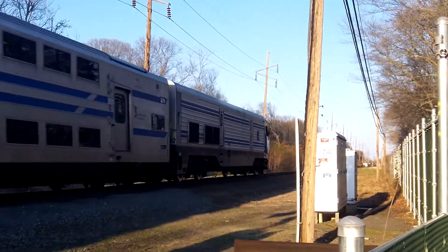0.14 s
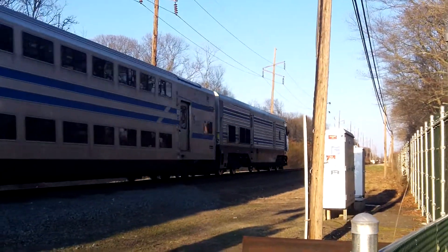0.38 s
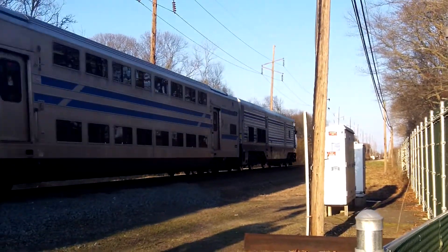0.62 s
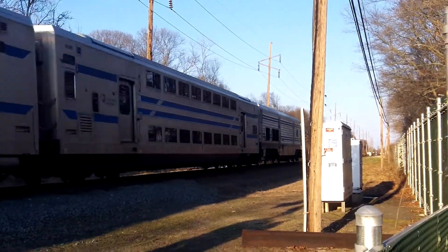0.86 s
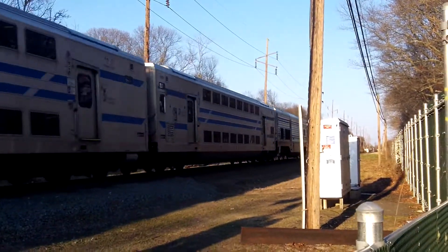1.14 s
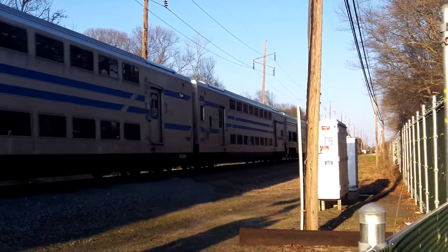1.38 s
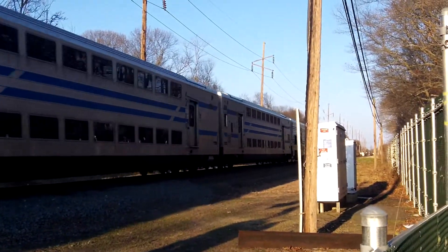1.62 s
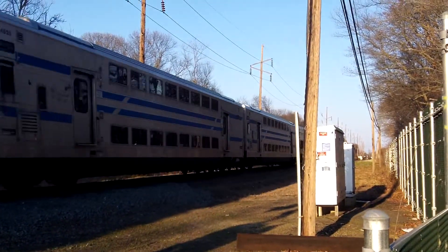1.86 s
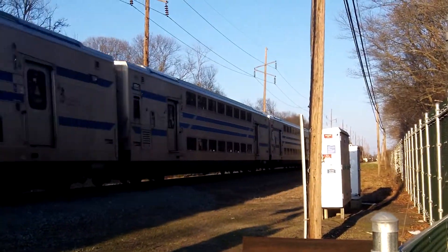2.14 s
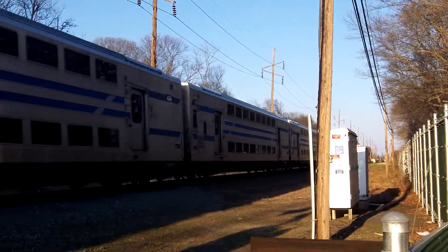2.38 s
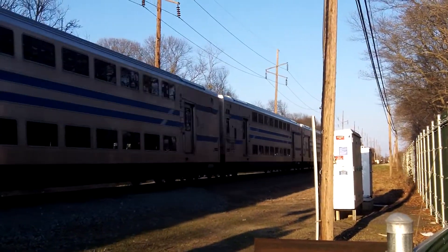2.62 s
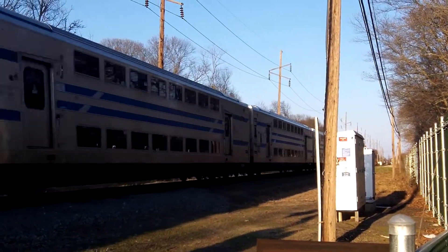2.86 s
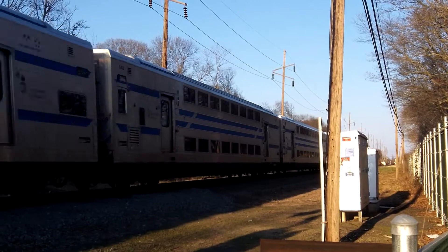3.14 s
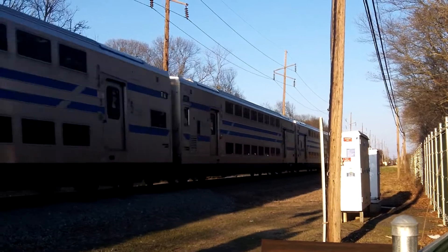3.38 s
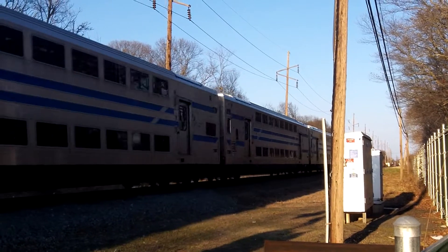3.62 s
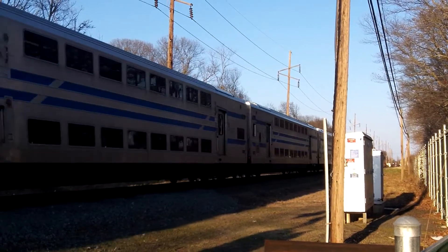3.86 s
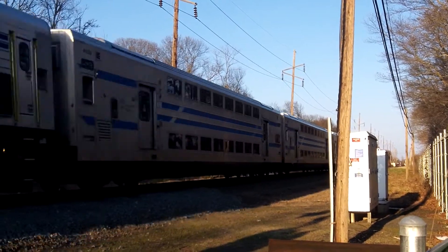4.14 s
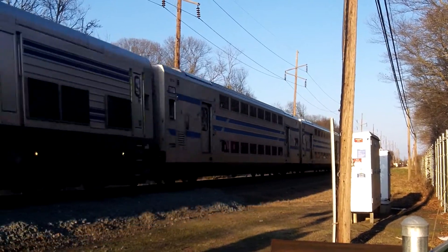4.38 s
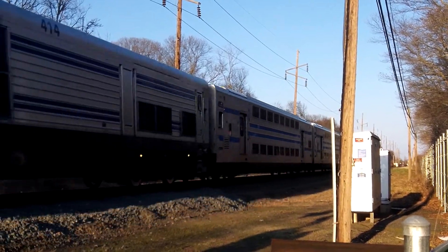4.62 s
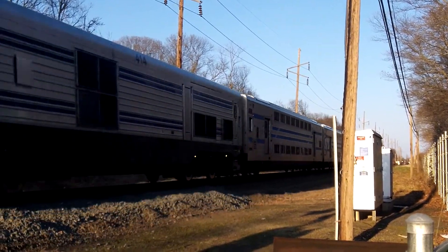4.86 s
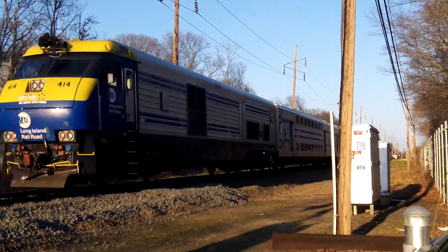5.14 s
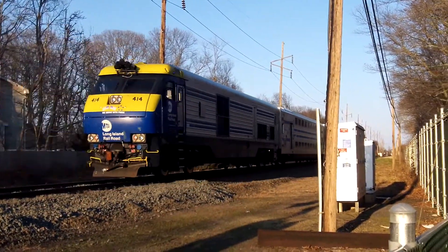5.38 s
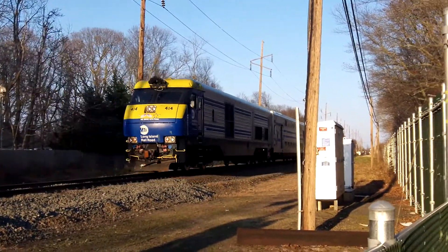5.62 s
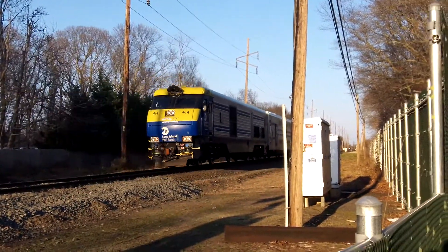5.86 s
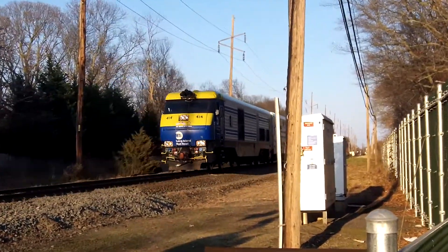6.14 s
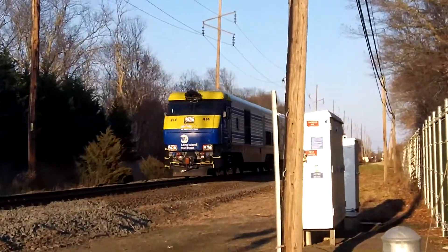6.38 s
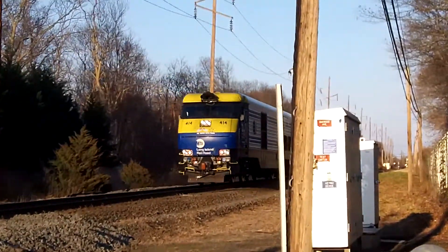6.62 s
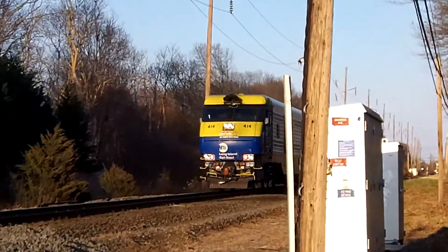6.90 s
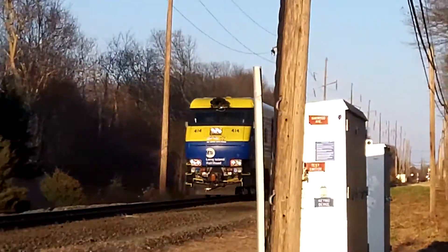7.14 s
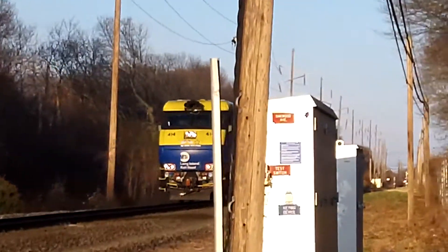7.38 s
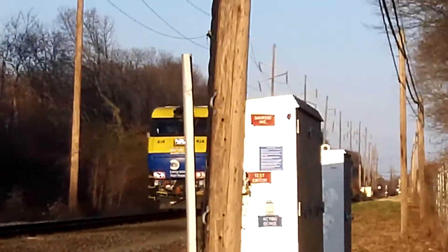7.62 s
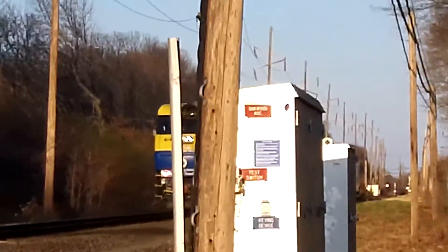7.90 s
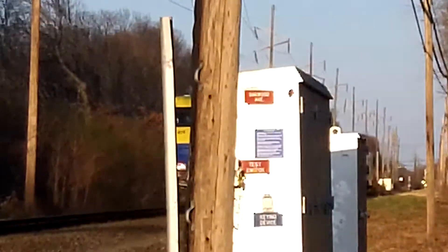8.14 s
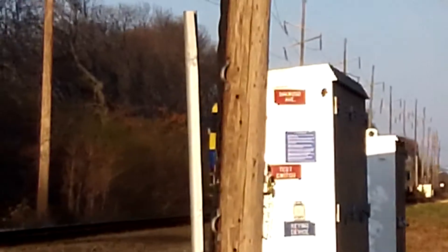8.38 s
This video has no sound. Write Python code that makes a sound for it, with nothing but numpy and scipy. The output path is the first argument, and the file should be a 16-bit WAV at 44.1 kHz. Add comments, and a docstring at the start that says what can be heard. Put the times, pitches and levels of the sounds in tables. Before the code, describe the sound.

Outdoors beside a railway, a passenger train rushes past close to the microphone. The leading diesel's hum fades while coach wheels roar, hiss, squeak and thump irregularly over rail joints. After about four seconds the rear diesel passes, its strong low drone dropping in pitch, and the clatter gives way to a steadier hum with a thin metallic whine.

```python
"""Passing train with two diesel locomotives

A passenger train with a diesel locomotive at each end rolls past the trackside. The exhaust hums are
harmonics of the engine cycle, Doppler-shifted: the front one recedes, the rear one nears, passes and
drops in pitch, and the two beat. Wheels roar and hiss as shaped noise, thump over rail joints as damped
oscillations and ring as resonances. A fast gain control pumps the quiet layers against the hum."""
import sys
import numpy as np
from scipy import signal
from scipy.fft import rfft, irfft, next_fast_len
from scipy.io import wavfile
from scipy.ndimage import uniform_filter1d, map_coordinates

SR = 44100
rng = np.random.default_rng(int(sys.argv[2]) if len(sys.argv) > 2 else 0)


def bounce(signal):
    """Save signal as a 16-bit WAV file at the path given by the first command-line argument."""
    frames = np.transpose(np.atleast_2d(signal))
    limited = np.clip(frames, -1, 1)
    pcm = np.round(limited * 32767).astype(np.int16)
    wavfile.write(sys.argv[1], SR, pcm)


def boost_factor(decibels):
    """Convert a level in decibels to a linear amplitude factor."""
    exponent = np.asarray(decibels, float) / 20
    return 10 ** exponent


N = 375291


def unit(x):
    """Normalization: scales a signal to rms 1."""
    return x / np.sqrt(np.mean(x ** 2) + 1e-20)


def curves(rows):
    """Linear interpolation: one value per sample for each column after the time."""
    s, *columns = np.transpose(rows)
    return [np.interp(np.arange(N) / SR, s, column) for column in columns]


def wobble(rate):
    """Random modulation: a smooth curve through Gaussian knots, rate knots a second."""
    knots = rng.standard_normal(int(N * rate / SR) + 4)
    return map_coordinates(knots, [np.arange(N) * rate / SR])


def filtered(x, response):
    """Linear filtering: multiplies the spectrum of x by a response of frequency."""
    m = next_fast_len(N + 8192)
    return irfft(rfft(x, m) * response(np.fft.rfftfreq(m, 1 / SR)), m)[:N]


def rush(spectrum, patchy_db):
    """Spectral shaping: coloured noise of rms 1 with random gain patches in time and frequency."""
    z = signal.stft(rng.standard_normal(N), nperseg=512)[2]
    field = uniform_filter1d(rng.standard_normal(z.shape), size=5, axis=0)
    field = uniform_filter1d(field, size=8, axis=1)
    noise = signal.istft(z * boost_factor(patchy_db * unit(field)), nperseg=512)[1][:N]
    hz, db = np.transpose(spectrum)
    return unit(filtered(noise, lambda f: boost_factor(np.interp(np.log(f + 1), np.log(hz), db))))


def band(hz, width, drift=0):
    """Resonance: rms-1 noise on a quadrature carrier whose pitch may wander by a share drift."""
    swing = [filtered(rng.standard_normal(N), lambda f: 1 / (1 + (f / width * 2) ** 2)) for _ in range(2)]
    turn = 2 * np.pi * np.cumsum(hz * (1 + drift * wobble(7))) / SR
    return unit(swing[0] * np.cos(turn) + swing[1] * np.sin(turn))


def knocks(rows, cycles):
    """Damped oscillation: soft-edged knocks whose envelope peaks after a number of cycles."""
    out = np.zeros(N + SR)
    for s, db, hz in rows:
        u = np.arange(int(6 * cycles * SR / hz)) * hz / SR  # time in cycles
        envelope = np.exp(1 - u / cycles) * u / cycles
        out[round(s * SR):][:len(u)] += boost_factor(db) * np.sin(2 * np.pi * u) * envelope
    return out[:N]


FIRING_HZ, SPEED_M_S, TRACK_M = 73.527, 23.94, 12.22  # firing rate at rest, train speed, distance to track
REV_UP_S = 7.07


def heard(passes_s, rev_up_hz=0):
    """Doppler effect: firing pitch is raised while the engine nears, lowered once it has passed."""
    t = np.arange(N) / SR
    along = SPEED_M_S * (t - passes_s)
    firing = FIRING_HZ + rev_up_hz * (t > REV_UP_S)
    recession = SPEED_M_S * along / np.hypot(along, TRACK_M)
    return firing / (1 + recession / 343)  # speed of sound in m/s


def exhaust(hz, rows, uneven):
    """Harmonic synthesis: the firing tone plus weaker multiples of the engine cycle, each swelling."""
    db, = curves(rows)
    t = np.arange(N) / SR
    sounding = (t >= rows[0][0]) & (t < rows[-1][0] + .05)
    turn = 2 * np.pi * np.cumsum(hz * sounding) / SR
    tone = np.cos(turn)
    for multiple, level_db in uneven:
        partial = np.cos(turn * multiple / 9 + 2 * np.pi * rng.random())  # nine firings a cycle
        tone += boost_factor(level_db + 2.5 * wobble(2)) * partial
    fade = uniform_filter1d(sounding * 1., size=4001, mode="nearest")
    return np.sqrt(2) * boost_factor(db) * fade * tone


# front exhaust hum, firing tone: t/s, level/dB
FRONT_HUM = [(0.0, -19.5), (0.5, -24.5), (0.9, -21.7), (1.55, -23.3), (1.95, -27), (2.3, -23.5),
             (2.85, -30), (3.15, -28), (3.6, -33)]
# rear exhaust hum, firing tone: t/s, level/dB
REAR_HUM = [(0.0, -29), (0.3, -24), (0.75, -36), (1.0, -28), (1.25, -23), (1.6, -26), (2.0, -23),
            (2.8, -22.7), (3.15, -18.5), (3.7, -17.2), (4.3, -18), (5.0, -17), (5.55, -19), (6.1, -16.9),
            (7.0, -16.7), (7.3, -17.4), (7.95, -16.5), (8.11, -18.5), (8.165, -23.5), (8.23, -20),
            (8.3, -28), (8.38, -21), (8.5, -20.7)]
# rear hum thrown back by what lies ahead of the train: t/s, level/dB
ECHO = [(4.792, -40), (5.45, -28), (6.25, -38), (6.7, -31), (7.0, -35), (7.35, -31), (7.8, -42), (8.5, -32)]
# partials from uneven firings: multiple of the engine cycle, mean level re firing tone/dB
UNEVEN_FIRING = [(6, -19), (7, -15), (8, -22), (10, -28), (11, -27), (12, -27), (15, -26), (18, -31),
                 (21, -32), (24, -35), (27, -36)]


def engine_hums():
    """Interference: two Doppler-shifted hums and an echo raised in pitch beat; the rear engine revs up."""
    front = exhaust(heard(passes_s=-0.954), FRONT_HUM, UNEVEN_FIRING)
    rear = exhaust(heard(passes_s=4.249, rev_up_hz=0.69), REAR_HUM, UNEVEN_FIRING)
    return front + rear + exhaust(78.17, ECHO, [])


# part of the noise from the rear locomotive rather than the coaches: t/s, share (0-1)
LOCOMOTIVE_SHARE = [(0, 0.11), (3, 0.11), (3.6, 0.07), (4.6, 0.87), (5.3, 0.95), (8.51, 1)]


def blend(coaches, loco):
    """Power-preserving crossfade: coach sound gives way to the rear locomotive."""
    share = curves(LOCOMOTIVE_SHARE)[0]
    return np.sqrt(1 - share) * coaches + np.sqrt(share) * loco


def unsteady():
    """Modulation depth: share of flicker left, as the locomotive sounds steadier than the coaches."""
    return 1 - 0.55 * curves(LOCOMOTIVE_SHARE)[0]


# short rises and dips of roar, growl and hiss: t/s, roar gain/dB, growl gain/dB, hiss gain/dB
RISES_AND_DIPS = [(0.29, 0, 11, 4.5), (0.4, -4, 3, 1), (0.48, 9.5, 8, -0.5), (0.58, 4, 5, 3.5),
                  (0.78, 4, -2, 3.5), (0.93, -12, 0, 0.5), (0.99, -2, -4, -2), (1.04, 0.5, 7, 3),
                  (1.18, 5, 1, 2), (1.35, -4, 6, 2.5), (1.6, 6, 6, 1.5), (1.68, 4, -15, 3.5),
                  (1.77, 4, -1, 0.5), (1.86, -2, -4, 3), (2.03, 10, 5.5, 5), (2.15, 3, -3, 4.5),
                  (2.21, 5, 5, 3.5), (2.35, 5, -9, 3.5), (2.49, 6, 3, 4), (2.57, 0, 5, 4.5),
                  (2.68, 5, 5, 4), (2.79, 1, 6, 1.5), (2.87, 12.5, 12, 3), (3.04, 9, 7.5, 2),
                  (3.14, 0, 3, 0.5), (3.25, -1, 9, 1.5), (3.6, 3, 2, 0.5), (3.82, 8, 0, 2),
                  (3.92, 3, 14, 0.5), (4.17, 1, 7, 0.5), (4.28, 6, 8, 4), (4.35, 3.5, 2, 2.5),
                  (4.45, -1, 6.5, 3.5), (4.76, 3, 9.5, -0.5), (4.88, -5, 8, -1), (5.21, 7, 3, 1.5),
                  (5.31, -3, -1, 2), (5.44, -5, 2, 3.5), (5.625, 7, 10, 5), (5.7, 5, 0, 1.5),
                  (5.745, 6, 7, 6), (5.87, 0, 5, 3), (6.1, 5, 4, 5.5), (6.27, 6, 6, 5.5), (6.39, -2, -3, 3),
                  (6.52, 3, 7.5, 3.5), (6.63, 9, 4, 5), (6.75, 7, -4, 3.5), (7.11, 3, 7, 5),
                  (7.35, 0.5, 5, 4.5), (7.49, -2, 4, 2), (7.59, 0, 5, 5.5), (7.8, 1, 4, 1),
                  (8.09, 1, 4, 2.5), (8.22, 6, 5.5, 3)]
# Gaussian half width of a rise or dip: one entry each for roar, growl and hiss [s]
RISE_WIDTHS = [0.013, 0.013, 0.024]


def rises_and_dips():
    """Amplitude modulation: gain in dB of roar, growl and hiss, a sum of short Gaussian rises and dips."""
    t = np.arange(0, N, 64) / SR  # a coarse grid suffices
    s, *gains = np.transpose(RISES_AND_DIPS)
    sums = [db @ np.exp(-.5 * ((t - s[:, None]) / width) ** 2) for db, width in zip(gains, RISE_WIDTHS)]
    return [np.interp(np.arange(N) / SR, t, row) for row in sums]


def thuds(roar_db):
    """Random impacts: wheel flats and loose parts under the coaches thud at a level tied to the roar."""
    when, size, pitch = rng.random((190, 3)).T
    s = when * (N - 1) / SR
    db = roar_db[(s * SR).astype(int)] - 1 + 10 * (size - .5)
    return knocks(zip(s, db, 300 * 2.4 ** (pitch - .5)), cycles=0.7)


# running gear before rises and dips: t/s, low roar level/dB, growl level/dB
RUNNING_GEAR = [(0.0, -32, -32), (0.35, -27.5, -34), (0.7, -27.5, -30), (1.25, -27, -35), (1.5, -30.5, -36),
                (1.9, -24.5, -31.5), (2.42, -32, -35), (2.6, -32, -37), (3.0, -28, -35), (3.4, -36, -37.5),
                (4.12, -35, -42.5), (4.4, -28.5, -39), (4.9, -37, -45.5), (5.3, -27, -42.5),
                (5.8, -34, -43), (6.0, -33.5, -45), (6.6, -35, -40), (6.8, -36, -42), (7.3, -31, -40),
                (7.97, -38.5, -44.5), (8.1, -31, -38), (8.17, -37, -39.5), (8.3, -32, -38.5),
                (8.51, -31, -35)]
# low roar spectrum of the coach bogies: f/Hz, relative level/dB
BOGIE_SPECTRUM = [(59, -32), (100, -2.5), (172, 0.5), (377, -5), (427, -18), (480, -16), (620, -36.5),
                  (1060, -120)]
# low roar spectrum of the locomotive's engine room: f/Hz, relative level/dB
ENGINE_ROOM_SPECTRUM = [(51, -18.5), (86, -6), (97, -13.5), (150, -16), (205, -21), (250, -27), (328, -31),
                        (460, -34.5), (600, -54), (1010, -120)]
# growl spectrum of the coach bodies: f/Hz, relative level/dB
BODY_SPECTRUM = [(250, -29.5), (430, 3), (503, -2), (900, -7), (1170, -30), (1980, -120)]
# throaty growl spectrum of the locomotive: f/Hz, relative level/dB
THROAT_SPECTRUM = [(250, -18), (430, -3), (527, -3.5), (610, 1.5), (740, -7.5), (900, -16.5), (1170, -27.5),
                   (1980, -120)]


def running_gear():
    """Modulated broadband noise: a lumpy low roar, a throaty growl above it and random thuds."""
    roar_db, growl_db = np.add(curves(RUNNING_GEAR), rises_and_dips()[:2])
    roar_db = roar_db + 1.1 * unsteady() * wobble(18)
    growl_db = growl_db + 0.98 * unsteady() * wobble(18)
    lumps = boost_factor(unsteady() * (0.5 * wobble(10) + 1.1 * wobble(45)))
    roar = blend(rush(BOGIE_SPECTRUM, patchy_db=2.0), rush(ENGINE_ROOM_SPECTRUM, patchy_db=0.0))
    growl = blend(rush(BODY_SPECTRUM, patchy_db=2.5), rush(THROAT_SPECTRUM, patchy_db=-0.9))
    growl *= boost_factor(1.1 * unsteady() * wobble(60))
    noise = boost_factor(roar_db) * unit(lumps * roar) + boost_factor(growl_db) * unit(lumps * growl)
    return noise + blend(thuds(roar_db), 0)


# wheels over rail joints: t/s, envelope peak level/dB, f/Hz
RAIL_JOINTS = [(0.332, -18, 196), (0.484, -16, 190), (0.498, -21, 200), (0.583, -7, 190), (0.611, -14, 200),
               (0.653, -13, 202), (0.724, -15, 229), (0.755, -13, 180), (0.784, -20, 200),
               (0.822, -16, 198), (0.884, -19, 150), (0.917, -14, 186), (0.988, -16, 188),
               (1.091, -16, 188), (1.178, -22, 275), (1.26, -21, 287), (1.448, -28, 224), (1.587, -15, 258),
               (1.601, -11, 206), (1.69, -12, 187), (1.759, -22, 176), (1.834, -17, 230), (1.865, -14, 178),
               (1.926, -16, 260), (2.023, -10, 190), (2.043, -15, 230), (2.091, -12, 170),
               (2.197, -14, 200), (2.232, -13, 334), (2.323, -29, 131), (2.66, -19, 262), (2.704, -15, 184),
               (2.773, -16, 277), (2.798, -12, 219), (2.868, -16, 262), (2.972, -19.5, 190),
               (3.006, -15, 300), (3.027, -23, 300), (3.13, -20, 226), (3.152, -19, 201), (3.8, -23, 171),
               (4.146, -20, 122), (4.268, -17, 174), (4.751, -17, 180), (4.872, -17.5, 178)]


def thumps():
    """Impact excitation: a low damped knock at each joint, with a short hard edge half a cycle in."""
    edge = [(s + 0.5 / hz, db - 9, hz * 3.0) for s, db, hz in RAIL_JOINTS]
    return knocks(RAIL_JOINTS, cycles=0.58) + knocks(edge, cycles=0.45)


# sudden bright hisses: t/s, treble gain before the rise and fade/dB, fade time/s
TREBLE_FLARES = [(0.73, 11, 0.022), (1.02, 7.5, 0.098), (1.66, 9.5, 0.3), (1.82, 6, 0.059),
                 (2.14, 4, 0.042), (2.73, 14, 0.091), (3.86, 6.5, 0.062), (3.99, 3, 0.11), (5.29, 5, 0.038),
                 (5.43, 3, .05), (5.66, 2, 0.099), (7.12, 6, .04), (7.6, 2, .04)]


def flares():
    """Transient envelope: dB gained by the treble, a quick exponential rise and a slow fade."""
    gain = np.zeros(N)
    for s, db, fade in TREBLE_FLARES:
        since = np.clip(np.arange(N) / SR - s, 0, None)
        gain += db * (1 - np.exp(-since / 0.0043)) * np.exp(-since / fade)
    return gain


# wheels on rails before rises and dips: t/s, hiss level/dB, treble level re hiss/dB
ROLLING_HISS = [(0.0, -34.5, -11), (0.14, -35, -15), (0.35, -29.5, -17.5), (0.9, -33, -17.5),
                (1.3, -31, -16), (1.95, -33.5, -18), (2.4, -34.5, -18), (2.6, -32.5, -18),
                (3.1, -33.5, -14.5), (3.45, -37, -15.5), (4.1, -39, -13.5), (4.4, -38, -15.5),
                (4.86, -39, -8.5), (5.1, -36.5, -12.5), (5.5, -34.5, -11.5), (5.7, -34.5, -13),
                (5.8, -36.5, -12), (6.0, -37.5, -14), (6.7, -36.5, -15), (6.9, -36.5, -19.5),
                (7.4, -36, -17.5), (8.04, -36.5, -17.5), (8.14, -35, -20), (8.18, -32.5, -18),
                (8.25, -32, -20.5), (8.35, -32, -20), (8.51, -28.5, -21)]
# rolling spectrum of the coaches: f/Hz, relative level/dB
COACH_SPECTRUM = [(410, 0.5), (700, 0), (1230, 0), (1410, -3), (1950, -6.5), (2290, -8.5), (2610, -12),
                  (3090, -9), (4300, -11), (6560, -21.5), (7200, -28), (7700, -34), (10000, -80.5),
                  (16900, -120)]
# rolling spectrum of the locomotive: f/Hz, relative level/dB
LOCO_SPECTRUM = [(410, -25), (700, -3.5), (782, -3.5), (1490, -1.5), (1610, -4), (1950, -2), (3740, -6),
                 (4050, -5), (6050, -17), (7250, -25.5), (7700, -46), (10000, -61), (16900, -120)]
# ringing wheel modes: f/Hz, width/Hz, coach level re hiss/dB, locomotive level re hiss/dB
WHEEL_MODES = [(1464, 310, -9.5, -31), (1900, 360, -13.5, -14.5), (2593, 300, -12.5, -29),
               (3442, 310, -18, -18), (4370, 440, -20.5, -28.5), (4870, 99, -40.5, -19.5),
               (5840, 120, -38, -26)]


def rolling():
    """Rolling contact: broadband hiss of steel on steel with flickering, wandering wheel modes."""
    hiss_db, bright_db = np.add(curves(ROLLING_HISS), [rises_and_dips()[2], flares() + 0.84 * wobble(17)])
    hiss = blend(rush(COACH_SPECTRUM, patchy_db=1.1), rush(LOCO_SPECTRUM, patchy_db=0.9))
    # each ringing band wanders randomly in pitch and level
    for hz, width, coach_db, loco_db in WHEEL_MODES:
        mode_level = blend(boost_factor(coach_db), boost_factor(loco_db)) * boost_factor(1.2 * wobble(14))
        hiss += mode_level * band(hz, width, drift=0.015)
    treble = filtered(hiss, lambda f: 1 / (1 + (4600 / (f + 1)) ** 8))
    hiss += unit(treble) * boost_factor(bright_db) - treble  # sets the treble level re hiss
    rattle = boost_factor(0.58 * unsteady() * wobble(18) + 1.08 * wobble(120))
    return boost_factor(hiss_db) * hiss * rattle


def clanks():
    """Exponential decay: each joint also throws a short burst of rolling noise."""
    blows = np.zeros(N)
    for s, db, _ in RAIL_JOINTS:
        blows[round(s * SR)] = boost_factor(db - 21.5)
    decay = np.exp(-np.arange(SR // 10) / SR / 0.012)
    return signal.fftconvolve(blows, decay)[:N] * rush(COACH_SPECTRUM, patchy_db=2.5)


# sharp ticks: t/s, envelope peak level/dB, f/Hz
SHARP_TICKS = [(0.484, -25, 710), (0.584, -15, 900), (1.593, -18, 860), (2.028, -20, 820),
               (2.035, -22, 3930), (2.8, -17, 674), (3.133, -25, 1500), (3.15, -28, 1100),
               (5.861, -12.5, 3650), (7.1246, -21, 3270)]


def ticks():
    """Impulsive excitation: sharp damped ticks with a duller knock underneath."""
    body = [(s, db - 9, hz / 9.0) for s, db, hz in SHARP_TICKS]
    return knocks(SHARP_TICKS, cycles=1.5) + knocks(body, cycles=0.34)


# wheel squeaks and rings: middle t/s, peak level before roughness/dB, f/Hz, Gaussian half length/s
WHEEL_SQUEAKS = [(0.343, -32.5, 4220, .008), (0.393, -30, 1427, 0.017), (0.57, -36, 2583, .015),
                 (0.597, -32, 4170, .006), (0.702, -31.5, 4310, 0.02), (0.929, -30, 4190, 0.0056),
                 (1.045, -43, 2713, .015), (1.055, -43, 4250, .015), (1.246, -34, 2713, .012),
                 (1.344, -37, 2580, 0.024), (1.37, -40, 4390, .008), (1.475, -33.5, 4260, .01),
                 (1.574, -33, 2660, 0.012), (1.68, -33, 4310, .01), (1.685, -32, 3610, 0.012),
                 (1.757, -41, 4170, 0.0078), (1.858, -32, 1851, .01), (1.86, -33, 3250, 0.011),
                 (1.866, -36, 2497, .01), (1.89, -27, 1593, .008), (2.164, -38, 1450, 0.012),
                 (2.24, -31, 2040, .01), (2.36, -39, 2670, 0.02), (2.518, -40, 2540, .012),
                 (2.541, -35, 2024, .012), (2.575, -35, 3488, .012), (2.658, -30.5, 2670, 0.014),
                 (2.928, -35, 4300, 0.0091), (2.972, -36, 3359, .012), (3.145, -33, 4200, .007),
                 (3.238, -30.5, 1490, 0.012), (3.93, -43, 4091, .01), (4.2, -38, 4048, .012),
                 (4.652, -37.5, 4000, .012), (4.715, -39, 3940, 0.009), (4.923, -43, 3930, .012),
                 (5.207, -37, 3920, .018), (5.274, -38, 4000, .008), (5.37, -29, 4070, 0.012),
                 (5.452, -30.5, 4050, 0.013), (5.629, -34, 2024, 0.01), (5.631, -43, 4100, .01),
                 (6.012, -39, 4010, 0.013), (6.11, -42, 3960, .014), (6.242, -37, 4050, 0.014),
                 (6.53, -34, 3980, 0.0092), (6.605, -41, 3950, .008), (6.628, -41, 3600, .012),
                 (6.672, -33, 2024, 0.0097), (6.7, -44, 3990, .012), (6.978, -37, 3970, .009),
                 (7.07, -42, 3962, 0.0099), (7.216, -42, 3962, .009), (7.356, -33, 3950, 0.011),
                 (7.573, -41, 3940, .014), (7.655, -35, 3960, 0.016), (7.8, -41, 3920, .012),
                 (8.37, -46, 3920, .01), (8.492, -39, 4020, .012)]


def squeaks():
    """Tone bursts: Gaussian-enveloped sines, hoarse under the coaches, purer under the locomotive."""
    t = np.arange(N) / SR
    out = np.zeros(N)
    for s, db, hz, half in WHEEL_SQUEAKS:
        near = slice(int((s - 4 * half) * SR), int((s + 4 * half) * SR))
        envelope = np.exp(-.5 * ((t[near] - s) / half) ** 2)
        out[near] += boost_factor(db) * envelope * np.sin(2 * np.pi * hz * t[near])
    return out * blend(0.25 + 0.9 * wobble(554), boost_factor(1.2 * wobble(100)))


# rear locomotive abreast: t/s, level/dB
ABREAST_LEVEL = [(3, -68), (3.4, -47), (4, -42.5), (4.5, -39.5), (4.9, -46.5), (5.4, -45.5), (5.9, -68)]
# its fan and intake bands: f/Hz, width/Hz, mean relative level/dB
INTAKE_BANDS = [(214.8, 120, 5.5), (638, 240, 0.5), (1160, 220, -5)]


def flank():
    """Resonant noise: fans and air intakes on the rear locomotive's side, loudest about abreast."""
    bands = sum(boost_factor(db + 1.8 * wobble(25)) * band(hz, width) for hz, width, db in INTAKE_BANDS)
    return boost_factor(curves(ABREAST_LEVEL)[0]) * bands


# thin whine before swells and flicker: t/s, level/dB
WHINE_LEVEL = [(4.3, -69), (4.7, -52), (5.0, -57), (5.5, -45), (5.8, -47), (6.06, -54), (6.2, -52),
               (6.5, -49), (6.72, -46.5), (6.9, -66), (7.0, -50), (7.35, -46), (7.44, -53), (7.55, -47),
               (7.84, -46.5), (7.95, -67), (8.51, -51)]


def whine():
    """Narrow-band noise: a wavering whine trails the rear locomotive, swelling at squeaks near its pitch."""
    t = np.arange(N) / SR
    near_pitch = [s for s, _, hz, _ in WHEEL_SQUEAKS if abs(hz - 3965) < 150]
    swell = sum(np.exp(-.5 * ((t - s) / 0.025) ** 2) for s in near_pitch)
    flicker = 1.5 * wobble(12) + 1.5 * wobble(40)
    db = curves(WHINE_LEVEL)[0] + 0.52 * rises_and_dips()[2] + 1.5 * swell + flicker
    return (t > WHINE_LEVEL[0][0]) * boost_factor(db) * band(hz=3965, width=110, drift=.004)


# ground rumble before its random wobble: t/s, level/dB
GROUND_LEVEL = [(0.0, -29.5), (0.5, -24.5), (0.85, -32), (1.4, -23), (1.8, -29.5), (2.15, -25),
                (2.7, -22.5), (3.4, -35), (3.9, -22), (4.4, -25.5), (5.2, -39.5), (6.4, -51), (6.65, -27),
                (7, -42), (8.51, -50)]
# ground rumble spectrum: f/Hz, relative level/dB
RUMBLE_SPECTRUM = [(12, -30), (20, -22.5), (43, -7.5), (56, -16.5), (73, -7.5), (120, -120)]


def ground_rumble():
    """Low-frequency noise: ground rumble of slowly wobbling level."""
    return boost_factor(curves(GROUND_LEVEL)[0] + 1.5 * wobble(6)) * rush(RUMBLE_SPECTRUM, patchy_db=0.8)


# sizzle bands: f/Hz, relative level/dB
SIZZLE_SPECTRUM = [(7900, -56), (8250, 1), (8600, 2.5), (9000, -6), (9750, 6.5), (10500, -3), (11400, 3),
                   (12300, -6.5), (13000, -16.5), (13400, -54.5)]
# gain of the faint sizzle above the band limit: t/s, gain/dB
SIZZLE_GAIN = [(0, 2), (3.2, 6.5), (4, 8), (5.3, 1.5), (6.5, 3.5), (8.51, 9)]


def sizzle():
    """Envelope following: faint patchy high bands track the treble of the hiss, with steeper flares."""
    treble_db = sum(curves(ROLLING_HISS)) + rises_and_dips()[2] + 1.23 * flares()
    db = treble_db - 25.5 + curves(SIZZLE_GAIN)[0]
    return boost_factor(db + 1.0 * wobble(30)) * rush(SIZZLE_SPECTRUM, patchy_db=4.5)


def scene():
    """Superposition: engine hums, running gear, wheels on rails, locomotive side and ground."""
    gear = running_gear() + thumps() + ground_rumble()
    wheels = rolling() + squeaks() + ticks() + clanks()
    return (engine_hums() + gear + wheels + flank() + whine())[None]


def gain_control(x, target_db, depth, window):
    """Dynamic compression: gain opposes the short-term power, so quiet layers swell when the hum dips."""
    size = int(window * SR)
    # absolute values guard against rounding below zero
    power = np.abs(uniform_filter1d(x ** 2, size=size, origin=(size - 1) // 2, axis=-1))
    power = np.abs(uniform_filter1d(power, size=size // 2, axis=-1))
    return x * (power / boost_factor(2 * target_db) + 0.064) ** (-depth / 2)  # 0.064 bounds the gain


def top_cut(x):
    """Nothing passes above the cut-off."""
    return signal.sosfilt(signal.butter(12, 13390, fs=SR, output="sos"), x)


def record(dry):
    """Nonlinear transmission: gain control, soft clipping and a steep band limit; sizzle lies above it."""
    x = gain_control(dry, target_db=-16.5, depth=0.48, window=0.028)  # window in s
    hardness = 6.8
    x = x / (1 + np.abs(x / 0.55) ** hardness) ** (1 / hardness)
    limited = filtered(x[0], lambda f: 1 / (1 + (f / 7600) ** 60))
    mix = limited + sizzle()
    return top_cut(mix)


dry = scene()
out = record(dry)
bounce(out)
```